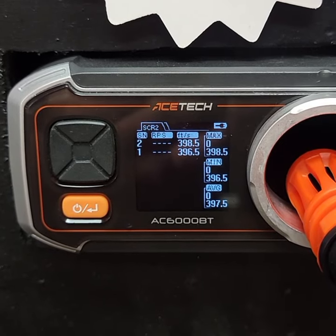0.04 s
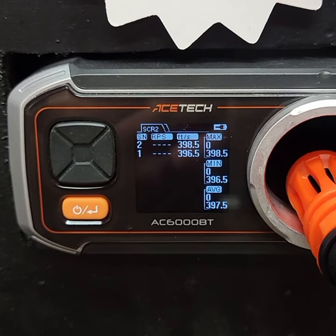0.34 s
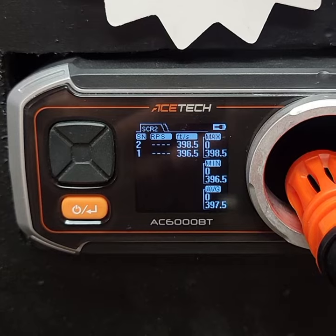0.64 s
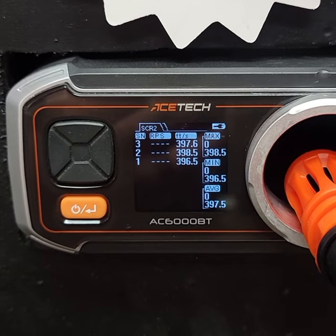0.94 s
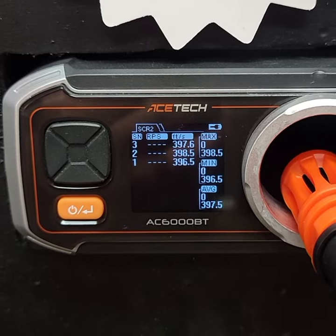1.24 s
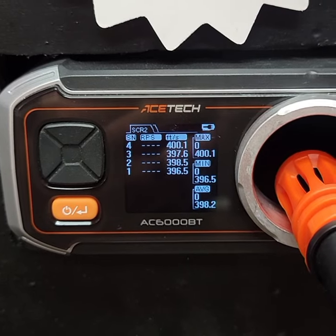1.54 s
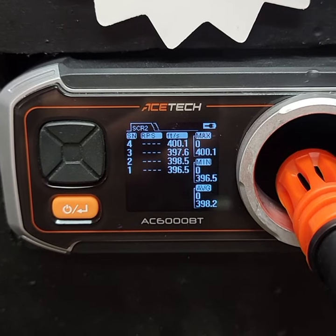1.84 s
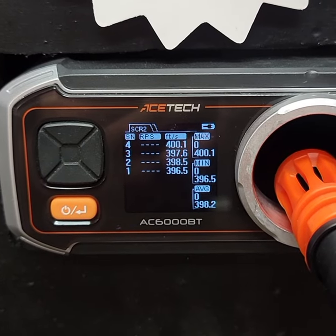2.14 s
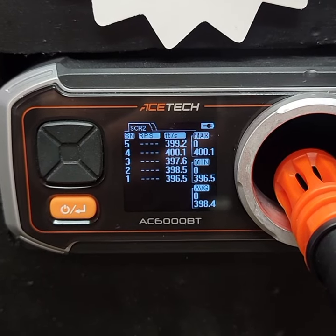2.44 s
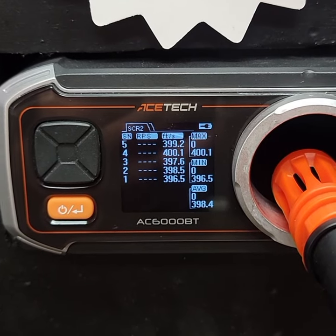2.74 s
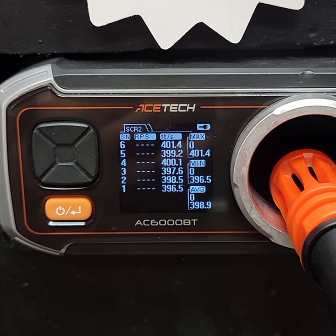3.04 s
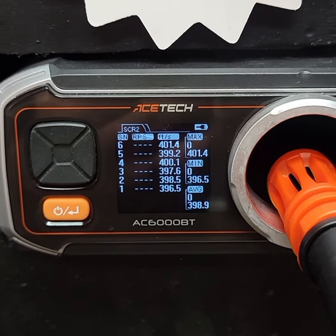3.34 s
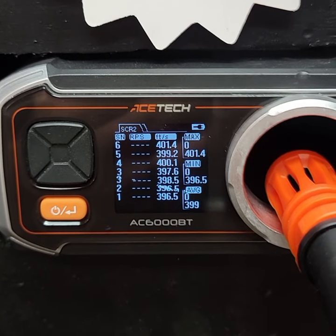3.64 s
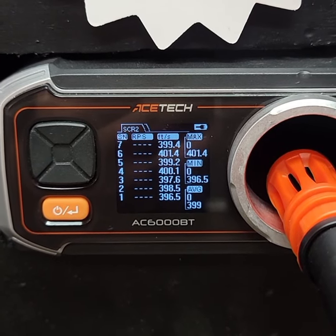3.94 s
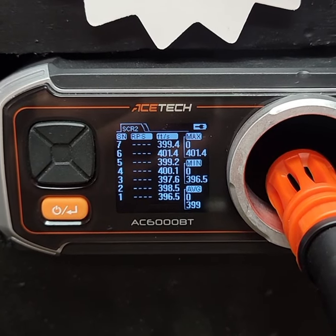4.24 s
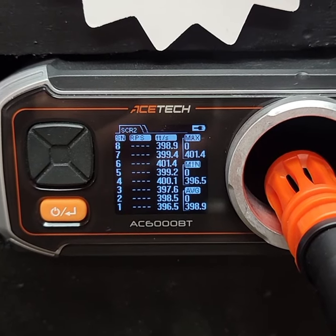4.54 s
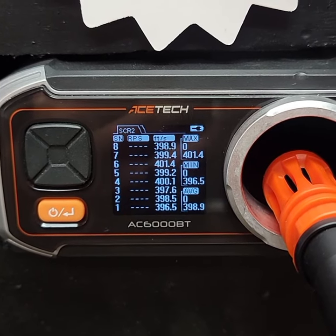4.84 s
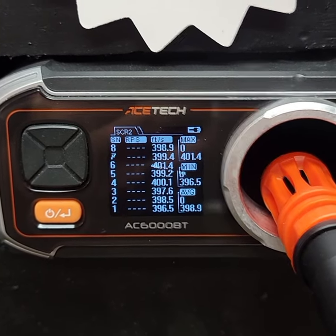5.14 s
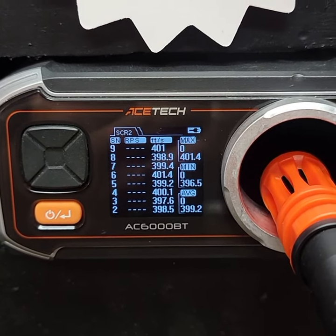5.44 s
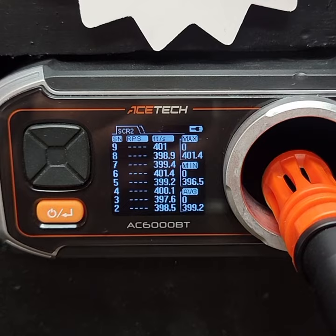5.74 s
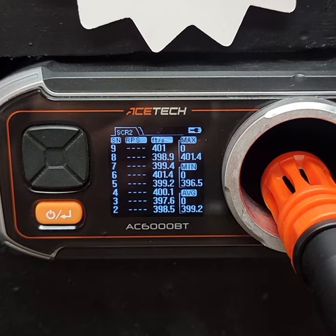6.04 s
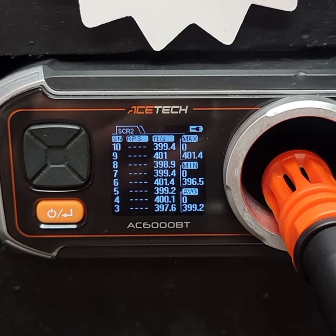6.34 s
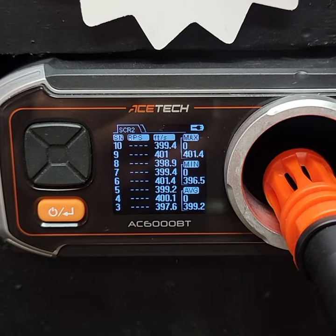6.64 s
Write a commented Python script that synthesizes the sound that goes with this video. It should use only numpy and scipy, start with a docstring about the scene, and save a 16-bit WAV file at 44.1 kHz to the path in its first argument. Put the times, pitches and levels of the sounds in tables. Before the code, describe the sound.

Eight single airsoft shots crack less than about a second apart indoors, each led by a quick whirr, with pellets ticking faintly afterwards.

```python
"""A small room rumbles faintly; then an electric airsoft rifle fires eight shots through a chronograph.
Each time the gears whirr for about 0.1 s to draw the spring, and the piston rushes forward.
The expelled air cracks at the muzzle and hisses away, while rifle and room boom and ring briefly.
Spent pellets then knock about, duller the longer they have flown. Half way through, a distant motor
fades out; around the last shot come a few thin plastic clicks."""
import sys
import numpy as np
from scipy import signal
from scipy.fft import rfft, irfft
from scipy.io import wavfile

SR = 44100
rng = np.random.default_rng(int(sys.argv[2]) if len(sys.argv) > 2 else 0)


def to_wav(sig):
    """Store sig (one row per channel, or 1-D mono) as 16-bit WAV at the path in sys.argv[1].

    Samples outside -1..1 are clipped; the rate is SR.
    """
    pcm = np.clip(np.atleast_2d(sig), -1, 1) * 32767
    pcm = np.round(pcm).astype(np.int16)
    wavfile.write(sys.argv[1], SR, pcm.T)  # frames by channels


N = 299218

# the shots, timed at the crack: start_s, crack_gain_db, wind_up_s, vent_gain_db
SHOT_EVENTS = [(0.719, 2.5, 0.1, -2), (1.5341, 0.5, 0.099, -9), (2.201, -0.5, 0.095, 1.5),
               (2.8616, -1.5, 0.1, 3), (3.6503, -0.5, 0.096, 4.5), (4.367, -1.5, 0.098, 4.5),
               (5.151, -1.5, 0.1, 4.5), (6.256, -0.5, 0.094, 1.5)]
# puffs of muzzle air, mostly on the left: centre_s, level_db, pitch_hz
AIR_PUFFS = [(1.5291, -19, 60), (3.6455, -12, 185), (5.1466, -12, 190), (6.2515, -15.5, 190)]
# impacts: start_s, level_db
PELLET_HITS = [(0.003, -58), (0.08, -65), (0.836, -30.5), (1.007, -41), (1.072, -52), (1.679, -43.5),
               (1.721, -39.5), (1.764, -46), (1.819, -53), (1.927, -58), (1.979, -48), (2.314, -31),
               (2.419, -44), (2.984, -38.5), (3.039, -51), (3.799, -46.5), (3.834, -47), (3.953, -60.5),
               (5.629, -67), (6.366, -32), (6.474, -44), (6.529, -45.5)]  # on walls and floor
PLASTIC_CLICKS = [(5.331, -50), (5.400, -49), (5.462, -52), (6.606, -52)]
# slow swell of the room hiss: time_s, gain_db
HISS_SWELL = [(0, 2), (1.5, 3.5), (3.3, -4.5), (5.0, -3), (6.0, 4)]
# reverberation time of the room: frequency_hz, t60_s
ROOM_DECAY = [(100, 1), (300, 0.53), (800, 0.32), (2000, 0.35), (4500, 0.29), (8000, 0.26), (15000, 0.21)]
# resonances of the gearbox shell: pitch_hz, bandwidth_hz, level_db
SHELL_MODES = [(734, 120, -9.5), (1354, 60, -8), (3120, 530, -2), (3500, 120, -2.5), (4270, 310, 1.5),
               (6240, 200, -11)]

# freely decaying modes: pitch_hz, level_db, t60_s
BOOM_MODES = [(114, -15, 0.36), (157.7, 0, .22), (212, -11, 0.28), (330.6, -13.5, .17), (396, -10, 0.1),
              (468.3, -1, .13), (791, -19.5, 0.22), (1226, -14.5, .12), (1340, -10, 0.18),
              (3140, -10.5, .12)]  # stock, barrel and the space around the muzzle
SPRING_MODES = [(878, -1.5, 0.88), (1320, -2, 1.0), (2090, -7, 1.6), (2655, 3, 1.4), (3310, -5, 1.4),
                (3580, 13, 0.68)]
TUBE_MODES = [(1010, -22, 0.0024), (1930, -17.5, 0.018), (2710, -10, 0.021), (3204, -10, 0.023),
              (3750, -16, 0.011), (7360, -14, 0.017), (13370, -10, .004), (15300, -5.5, .006)]  # muzzle and chronograph tube

# spectral envelopes of the sources: frequency_hz, gain_db
RUMBLE_SPECTRUM = [(12, -32.5), (20, 1), (81, -7.5), (107, -18), (154, -10.5), (187, -17.5), (367, -30),
                   (422, -46.5), (472, -41.5), (1480, -43), (1810, -51), (2670, -42), (7730, -57.5),
                   (16000, -47.5)]
CLICK_SPECTRUM = [(500, -11), (2500, -8), (4800, -1), (7000, -5), (10000, -4), (15000, -2.5)]
PELLET_SPECTRUM = [(100, -8), (350, -4.5), (700, 2.5), (1200, -0.5), (2200, -3.5), (4200, 0), (7000, -3),
                   (10000, -8), (15000, -5.5)]
GEAR_SPECTRUM = [(70, -20.5), (155, -9.5), (290, -9), (440, -21), (650, -10.5), (1300, -5.5), (1650, -9.5),
                 (2400, -9.5), (3200, -3), (4400, -5), (6400, -10.5), (8600, -24), (12800, -11),
                 (16000, -18)]
CLACK_SPECTRUM = [(100, -18.5), (300, -3.5), (680, 6), (1100, -3), (2200, -9), (3400, 3), (5000, -9),
                  (9000, -19.5), (15000, -13)]
VENT_SPECTRUM = [(500, -21.5), (3000, -5), (5000, -4.5), (7000, -4), (8300, -5), (9600, 0), (11500, -3.5),
                 (13500, 1.5), (15500, 4)]
BLAST_SPECTRUM = [(60, -12.5), (200, 0.5), (600, 4), (1200, 4), (1700, 1.5), (2300, -1), (3200, 3.5),
                  (4500, -0.5), (6000, -4.5), (7400, -4.5), (8300, -13.5), (9600, -4), (11500, -11),
                  (15000, -2)]  # the crack as the room returns it
HISS_SPECTRUM = [(200, -1), (700, 1), (1400, 1.5), (2000, -4.5), (3200, -4.5), (6000, -12), (9000, -16),
                 (14000, -14.5)]
RUSH_SPECTRUM = [(30, -7), (90, 6), (250, 0), (400, 2), (650, -1.5), (1300, -1.5), (2500, -8.5),
                 (15000, -18.5)]
FLUTTER_SPECTRUM = [(60, -4), (250, -3), (400, 5), (550, -3), (900, -13), (4000, -30)]
CRACK_SPECTRUM = [(60, -6.5), (250, .5), (700, 2), (3000, 1.5), (5500, -4.5), (8300, -3.5),
                  (10000, -.5), (15000, 0)]

# stereo balance of the sources: frequency_hz, left_minus_right_db
GEAR_BALANCE = [(150, 0.5), (400, -4), (700, -3.5), (1000, -2), (1500, -7.5), (2800, -4.5), (4200, -8.5),
                (6000, 0), (8500, -2), (13000, -3.5)]
BLAST_BALANCE = [(200, -1), (700, -2), (1600, -5), (3800, -2), (5500, -1), (15000, 1)]
TUBE_BALANCE = [(1000, 0), (3000, -6), (7400, -6), (14000, 6)]


def amp(db):
    """Amplitude grows tenfold every 20 dB."""
    return 10 ** (np.asarray(db) / 20)


def decay(t, t60):
    """Exponential damping: 60 dB down after t60 seconds."""
    return amp(-60 * t / t60)


def unit_rms(x):
    """Normalises mean power to 1."""
    return x / np.sqrt(np.mean(x ** 2) + 1e-20)


def unit_energy(x):
    """Normalises mean energy per channel to 1."""
    return unit_rms(x) / np.sqrt(x.shape[-1])


def curve_at(points, hz):
    """Interpolation on a log-frequency axis."""
    knots_hz, values = np.transpose(points)
    return np.interp(np.log(hz + 1), np.log(knots_hz + 1), values)


def pan(side_db):
    """A level difference, left minus right, gives direction."""
    return amp(np.array([[.5], [-.5]]) * side_db)


def add(mix, start_s, sound):
    """Superposition: a sound joins the mix at start_s."""
    part = mix[:, max(round(start_s * SR), 0):][:, :sound.shape[-1]]
    part += sound[..., :part.shape[-1]]


def colour(x, spectrum, balance=((1000, 0),), size=4096):
    """Minimum-phase filtering to a given spectrum and stereo balance."""
    hz = abs(np.fft.fftfreq(size, 1 / SR))
    log_gain = np.log(amp(curve_at(spectrum, hz)) * pan(curve_at(balance, hz)))
    response = np.exp(np.conj(signal.hilbert(log_gain)))
    taps = np.fft.ifft(response).real[:, :size // 2]
    return signal.oaconvolve(np.atleast_2d(x), taps, axes=1)[:, :x.shape[-1]]


def ring(modes, t):
    """Free vibration is a sum of damped sinusoids."""
    return sum(amp(db) * decay(t, t60) * np.sin(2 * np.pi * hz * t) for hz, db, t60 in modes)


def diffuse(count, coherent_hz=450):
    """A diffuse field at two points is coherent in the bass, unrelated in the treble."""
    left, other = rfft(rng.standard_normal((2, count)))
    coherence = .9 / (1 + (np.fft.rfftfreq(count, 1 / SR) / coherent_hz) ** 2)
    right = coherence * left + np.sqrt(1 - coherence ** 2) * other
    return irfft(np.array([left, right]), count)


def noise(count, spectrum):
    """Spectrally shaped diffuse noise at rms 1."""
    return unit_rms(colour(diffuse(count), spectrum))


def room(near_t60, far_db, build_s, count=32768):
    """Reverberation builds up; near reflections die fast, those of the whole room slowly."""
    hz, t, field = signal.stft(diffuse(count), SR, nperseg=256)
    far = amp(far_db) * decay(t, curve_at(ROOM_DECAY, hz)[:, None])
    field = field * np.hypot(decay(t, near_t60), far)
    tail = signal.istft(field, SR, nperseg=256)[1][:count * 2, :count]
    build_up = 1 - np.exp(-np.arange(count) / SR / build_s)
    return unit_energy(tail * build_up)


def echo(x, response):
    """Convolution with a room's impulse response gives the reflected sound."""
    return signal.oaconvolve(x, response, axes=1)[:, :N]


def building(rumble_db=-71, hiss_db=-87, hum_hz=119, hum_db=-79, motor_hz=75, motor_db=-68, stop_s=3.35):
    """Ambient noise: broadband rumble and hiss, a hum, and two harmonics of a distant motor that stops."""
    t = np.arange(N) / SR
    running = np.clip((stop_s - t) / .4, 0, 1)
    rumble = noise(N, RUMBLE_SPECTRUM) * amp(rumble_db + 3.5 * running)
    hiss = noise(N, HISS_SPECTRUM) * amp(hiss_db + np.interp(t, *np.transpose(HISS_SWELL)))
    hum = amp(hum_db) * np.sin(2 * np.pi * hum_hz * t)
    drift = np.interp(t, np.linspace(0, t[-1], 60), rng.standard_normal(60))
    phase = 2 * np.pi * np.cumsum(motor_hz * (1 + .023 * drift)) / SR
    motor = amp(motor_db) * running * (np.sin(phase) + amp(-3) * np.sin(2 * phase))
    return rumble + hiss + hum + motor


def clicks(click_t60=.03, room_db=-6):
    """Close to a source the direct field dominates: plastic clicks with little echo."""
    out, t = np.zeros((2, N)), np.arange(2048) / SR
    for start_s, level_db in PLASTIC_CLICKS:
        click = colour(diffuse(len(t)) * decay(t, click_t60), CLICK_SPECTRUM)
        add(out, start_s, amp(level_db) * click / abs(click).max())
    return out + amp(room_db) * echo(out, room(near_t60=.13, far_db=-8, build_s=.005))


def pellets(direct_db=2, room_db=6, tick_t60=.027, rebound_s=.06, rebound_db=-13.5, dulling_db_per_s=42):
    """Inelastic impact: each pellet rebounds once, more softly; slowed by flight, it knocks duller."""
    out, t = np.zeros((2, N)), np.arange(2048) / SR
    attack = np.minimum(t / .004, 1)
    for start_s, level_db in PELLET_HITS:
        walls = room(near_t60=.11, far_db=-10.5, build_s=.0025)
        flight_s = min([.5] + [start_s - shot_s for shot_s, *_ in SHOT_EVENTS if shot_s < start_s])
        dulling = [(3000, 0), (8000, -1 - dulling_db_per_s * flight_s)]
        skip_s = start_s + rebound_s * rng.uniform(.8, 1.2)
        for hit_s, hit_db in (start_s, level_db), (skip_s, level_db + rebound_db):
            tick = colour(diffuse(len(t)) * decay(t, tick_t60), PELLET_SPECTRUM)
            tick = colour(tick, dulling)
            tick = amp(hit_db) * tick / abs(tick).max()
            add(out, hit_s, amp(direct_db) * tick * attack)
            add(out, hit_s, amp(room_db) * echo(tick, walls))
    return out * pan(-2.5)


def gear_train(length_s, casing, mesh_hz=1180, sag=.12, bind_hz=260, spin_up_s=.021):
    """Forced vibration: teeth strike and scrape in a metal shell; the spring's load slows the motor."""
    t = np.arange(round(length_s * SR)) / SR
    speed = rng.uniform(.91, 1.05) * (1 - np.exp(-t / .008)) * (1 - sag * t / length_s)
    travel = np.cumsum(speed) / SR  # speed scales both mesh_hz and bind_hz
    mesh_cycles = mesh_hz * travel
    strikes = np.diff(np.floor(mesh_cycles), prepend=0) * amp(2.5 * rng.standard_normal(len(t)))
    teeth = unit_rms(strikes - strikes.mean()) * np.array([[-1], [1]])
    contact = .71 + np.exp(-(mesh_cycles % 1) / .13)
    scrape = signal.oaconvolve(diffuse(len(t)), casing, axes=1)[:, :len(t)] * contact
    binding = 1 + .3 * np.sin(2 * np.pi * (bind_hz * travel + rng.random()))  # once a turn
    drive = (unit_rms(scrape) + amp(-6) * teeth) * binding
    shell = sum(amp(db) * unit_rms(signal.lfilter(*signal.iirpeak(hz, hz / width, SR), drive))
                for hz, width, db in SHELL_MODES)
    whirr = unit_rms(colour(drive, GEAR_SPECTRUM, GEAR_BALANCE)) + amp(-7) * unit_rms(shell * pan(-10))
    envelope = np.minimum(t / spin_up_s, 1) ** 2 * np.clip((length_s - t) / .0037, 0, 1)
    return unit_rms(whirr) * envelope


def gearbox(whirr_db=-24, easing_db_per_s=.45, clack_db=-22, clack_lead_s=.072, room_db=-8):
    """Structure-borne sound: the gears whirr before each shot and the piston rack catches with a clack."""
    out, t = np.zeros((2, N)), np.arange(2048) / SR
    for shot_s, _, wind_up_s, _ in SHOT_EVENTS:
        casing = unit_energy(diffuse(len(t)) * decay(t, t60=.035))  # each cycle wakes other modes
        whirr = amp(whirr_db - easing_db_per_s * shot_s) * gear_train(wind_up_s, casing)
        add(out, shot_s - wind_up_s, whirr)
        clack = noise(len(t), CLACK_SPECTRUM) * decay(t, t60=.022) * pan(-6.5)
        add(out, shot_s - clack_lead_s, amp(clack_db + 1.5 * rng.standard_normal()) * clack)
    return out + amp(room_db) * echo(out, room(near_t60=.072, far_db=-14.5, build_s=.006))


def piston(rush_db=-29.5, lead_s=.0045, rush_width_s=.0057, push_db=-31, push_hz=88, puff_width_s=.0046):
    """Volume displacement: the piston drives out air just before the crack, at times in a low puff."""
    out, t = np.zeros((2, N)), np.arange(-1024, 1024) / SR
    leftward = amp([[0], [-17]])
    push = amp(push_db) * np.cos(2 * np.pi * push_hz * t) * leftward
    for shot_s, *_ in SHOT_EVENTS:
        rush = amp(rush_db) * noise(len(t), RUSH_SPECTRUM)
        add(out, shot_s - lead_s + t[0], (rush + push) * np.exp(-(t / rush_width_s) ** 2))
    for centre_s, level_db, pitch_hz in AIR_PUFFS:
        flutter = amp(-11) * noise(len(t), FLUTTER_SPECTRUM)[0]
        pulse = np.cos(2 * np.pi * pitch_hz * t + np.pi / 6)
        puff = (pulse + flutter) * np.exp(-(t / puff_width_s) ** 2)
        add(out, centre_s + t[0], amp(level_db) * puff * leftward)
    return out


def vent(hiss_db=-27, delay_s=.001, length_s=.035):
    """Jet noise: the remaining air hisses out of the barrel behind the pellet."""
    out, flow = np.zeros((2, N)), signal.windows.tukey(round(length_s * SR), .45)
    for shot_s, *_, vent_gain_db in SHOT_EVENTS:
        hiss = noise(len(flow), VENT_SPECTRUM) * flow * pan(2.2)
        add(out, shot_s + delay_s, amp(hiss_db + vent_gain_db) * hiss)
    return out


def rifle_body(boom_db=-21, rise_s=.012, spring_db=-81.5):
    """Impact excites modes: the piston's slam booms in and around the rifle and rings the spring."""
    out, t = np.zeros((2, N)), np.arange(65536) / SR
    boom = ring(BOOM_MODES, t) * (1 - np.exp(-t / rise_s)) * pan(-3)
    for shot_s, *_ in SHOT_EVENTS:
        add(out, shot_s, amp(boom_db) * boom)
        spring = [(hz, db + 3 * rng.standard_normal(), t60) for hz, db, t60 in SPRING_MODES]
        add(out, shot_s, amp(spring_db) * ring(spring, t))
    return out


def blast_echo():
    """An impulse returns as the room's response, coloured by the spectrum of the blast."""
    response = room(near_t60=.21, far_db=-16.5, build_s=.005)
    return unit_energy(colour(response, BLAST_SPECTRUM, BLAST_BALANCE))


def muzzle(tube_db=-1, air_db=-10.5, crack_t60=.011, right_lag_s=.0002, room_db=2, scatter_db=1):
    """Tube resonance: a burst of air rings muzzle and tube; the echo partly repeats, partly varies."""
    out, t = np.zeros((2, N)), np.arange(2048) / SR
    tube = colour(ring(TUBE_MODES, t), [(1000, 0)], TUBE_BALANCE)
    scatters = [blast_echo() for _ in SHOT_EVENTS]
    repeating = blast_echo()
    for (shot_s, gain_db, *_), scatter in zip(SHOT_EVENTS, scatters):
        air = noise(len(t), CRACK_SPECTRUM) * decay(t, crack_t60)
        crack = amp(tube_db) * tube + amp(air_db) * air
        crack[1] = np.interp(t - right_lag_s, t, crack[1], left=0)  # the longer path to the right
        add(out, shot_s, amp(gain_db) * crack)
        add(out, shot_s, amp(gain_db) * (amp(room_db) * repeating + amp(scatter_db) * scatter))
    return out


def scene():
    """Sound pressures add: the rifle, its pellets, the clicks and the quiet room."""
    return gearbox() + piston() + muzzle() + vent() + rifle_body() + pellets() + clicks() + building()


def record(dry, ceiling=.75, cutoff_hz=16050):
    """Soft saturation rounds the cracks; a low-pass filter then limits the band."""
    limited = dry / (1 + (dry / ceiling) ** 4) ** (1 / 4)
    low_pass = signal.firwin(301, cutoff_hz, window=("kaiser", 9), fs=SR)
    return signal.oaconvolve(limited, low_pass[None], "same", axes=1)


dry = scene()
out = record(dry)
to_wav(out)
```